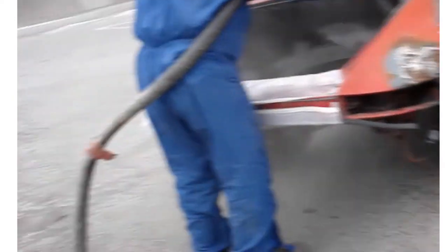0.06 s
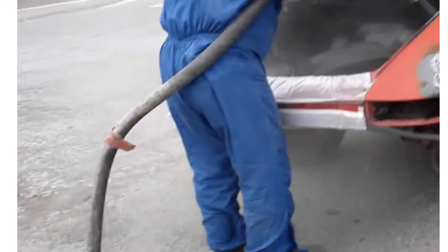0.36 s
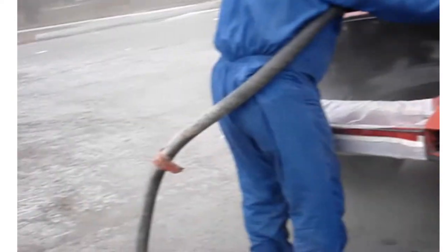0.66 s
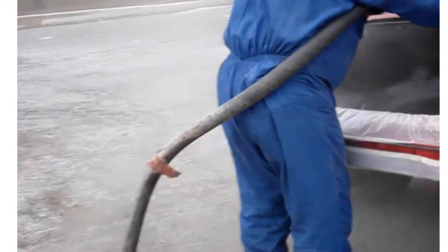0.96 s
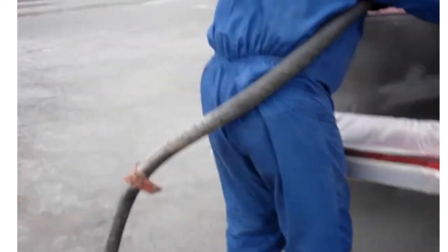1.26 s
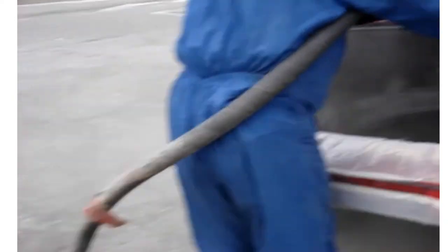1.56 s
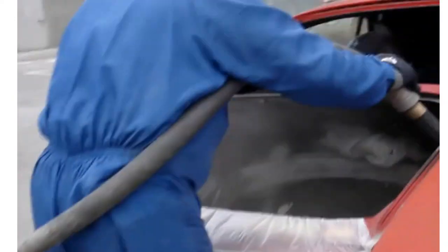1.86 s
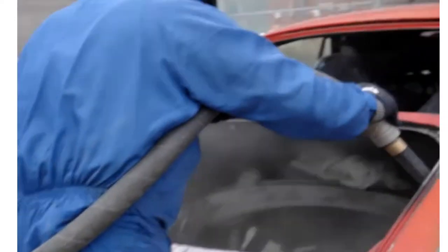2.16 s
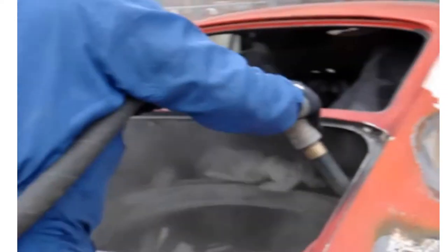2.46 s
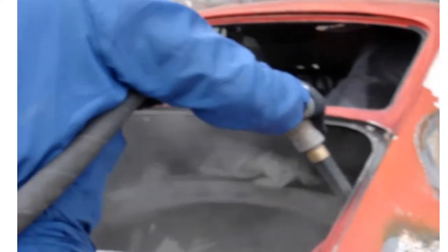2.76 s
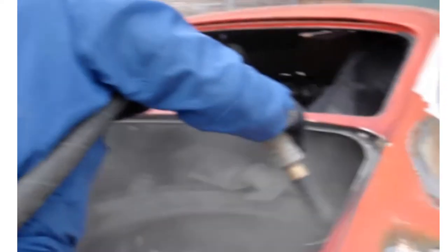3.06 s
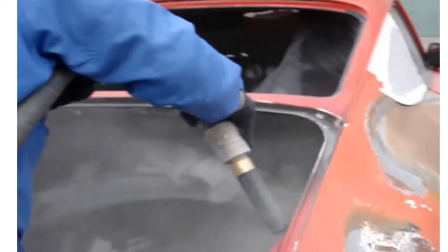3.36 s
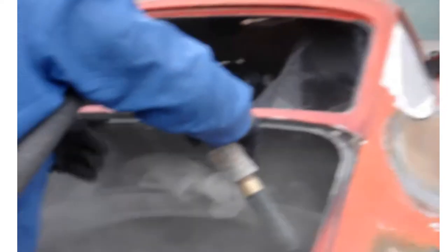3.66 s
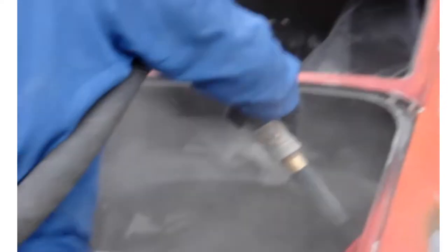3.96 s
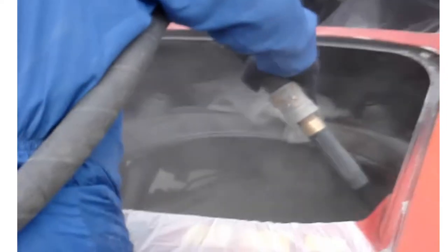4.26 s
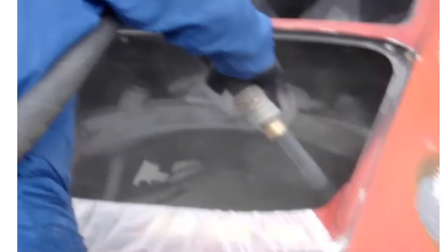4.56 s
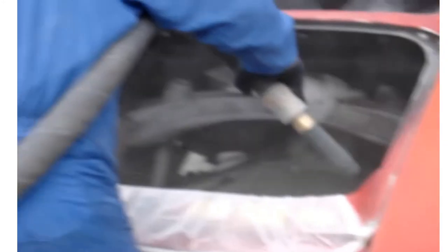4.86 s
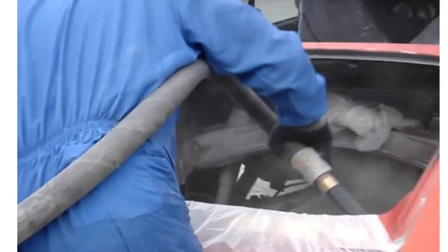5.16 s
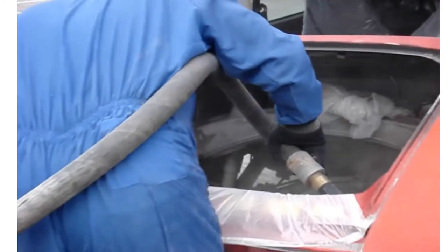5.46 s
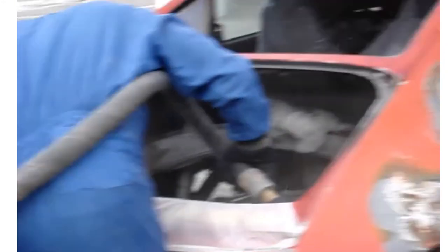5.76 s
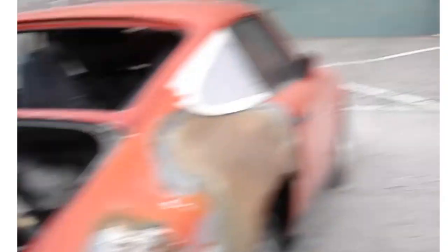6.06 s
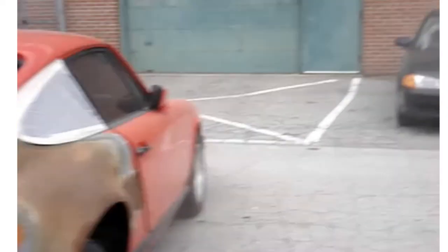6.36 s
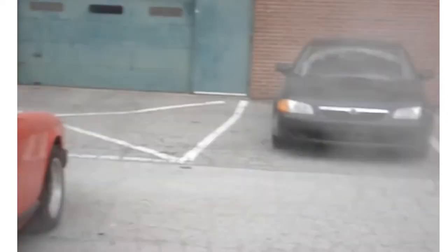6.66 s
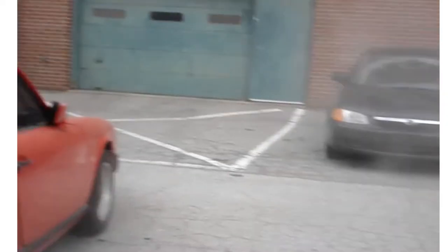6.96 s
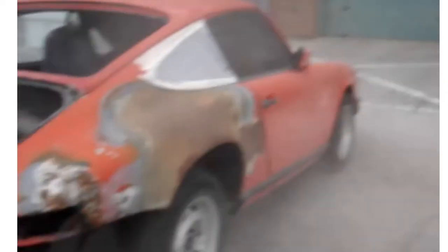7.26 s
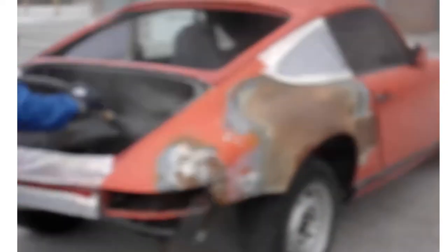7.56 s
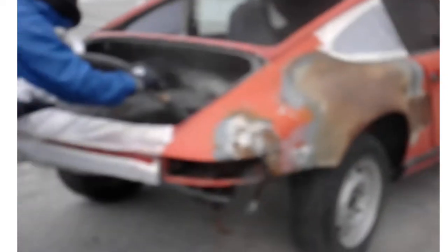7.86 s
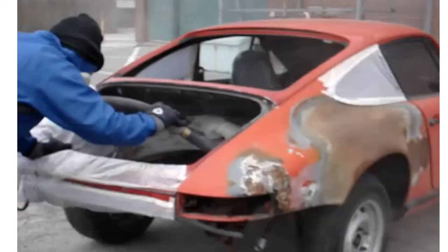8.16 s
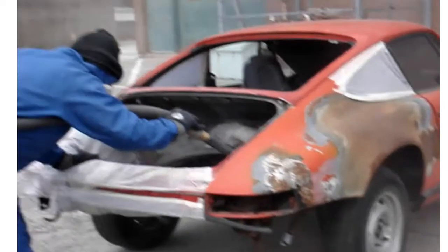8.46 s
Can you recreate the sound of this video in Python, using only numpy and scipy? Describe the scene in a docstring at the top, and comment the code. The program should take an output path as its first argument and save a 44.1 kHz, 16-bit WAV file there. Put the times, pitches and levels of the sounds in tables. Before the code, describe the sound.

A sandblaster hisses from start to finish, nearly nine seconds, its air and grit sizzling on the steel of a car's open engine bay. Short howls and whistles swell and fade as the jet crosses recesses, notably around 0.5, 1.2, 2.3 and 3.7 seconds. The hollow roar is strongest just after 2 seconds and drops briefly near 3.9 and 7.6. The hiss softens around 4 seconds, then grows brightest near 5.8 with a quick high whistle. More howls cluster between 6 and 7 seconds, and from 7.8 to the end. Scattered split-second dips leave a few glassy tones, most often between 5 and 7 seconds. Behind everything a diesel compressor drones with a wavering fan tone, quieter from about 3.5 to 5.5 seconds. A light outdoor breeze rumbles faintly on the single hand-held microphone.

```python
"""A sandblaster strips the open engine bay of a car body in a yard. Its air jet hisses, grit sizzles
on the steel, and the bay roars and howls briefly wherever the jet sweeps over a recess. Now and then
the sound dips for an instant to a few glassy tones. Behind it a diesel compressor drones with its
cooling fan. One hand-held microphone moves about in a light breeze."""
import sys
import numpy as np
from scipy import signal
from scipy.fft import rfft, irfft, next_fast_len
from scipy.io import wavfile
from scipy.ndimage import uniform_filter1d

SR = 44100
rng = np.random.default_rng(int(sys.argv[2]) if len(sys.argv) > 2 else 0)


def master(y):
    """Save y as 16-bit WAV."""
    cut = np.clip(np.atleast_2d(y).T, -1, 1)
    pcm = np.round(cut * 32767)  # scale
    wavfile.write(sys.argv[1], SR, pcm.astype(np.int16))


N = 383669
TIME = np.arange(N) / SR


def from_db(db):
    """Turn decibels (dB) into a number to multiply a sound by."""
    return 10 ** (np.asarray(db) / 20)


def unit_power(x):
    """Scale a sound so that its average power is one."""
    return x / np.sqrt(np.mean(x ** 2) + 1e-20)


def evened(x, window_samples=8000):
    """Even out slow changes in loudness, holding the power at one."""
    return x / np.sqrt(np.abs(uniform_filter1d(x ** 2, window_samples)) + 1e-20)


def curve(rows):
    """Join (seconds, value) points with straight lines, giving a value for every sample."""
    seconds, values = np.transpose(rows)
    return np.interp(TIME, seconds, values)


def filtered(x, gain_at):
    """Turn each frequency up or down by the gain that gain_at(hz) gives."""
    size = next_fast_len(N + 4096)
    hz = np.maximum(np.arange(size // 2 + 1) * SR / size, 1)
    return irfft(rfft(x, size) * gain_at(hz), size)[:N]


def coloured(x, points):
    """Set a sound's balance of low and high from (Hz, dB) points, then scale its power to one."""
    point_hz, db = np.transpose(points)
    return unit_power(filtered(x, lambda hz: from_db(np.interp(np.log(hz), np.log(point_hz), db))))


def drift(rate_hz):
    """A smooth random wander, about one in size; a higher rate wanders faster."""
    pole = np.exp(-200 * np.pi * rate_hz / SR)
    noise = rng.standard_normal(N // 100 + 2002)   # one value per 100 samples
    slow = signal.lfilter([1], [1, -2 * pole, pole * pole], noise)[2000:]
    return np.interp(np.arange(N) / 100, np.arange(len(slow)), unit_power(slow - slow.mean()))


def resonance(x, hz, width_hz):
    """Let through the sound near one pitch, as a ringing hollow does."""
    pole = np.exp(-np.pi * width_hz / SR)
    feedback = [1, -2 * pole * np.cos(2 * np.pi * hz / SR), pole * pole]
    return signal.lfilter(np.array([1, 0, -1]) * (1 - pole * pole) / 2, feedback, x)


# The breeze, with one gust and a lull. Each row: time in seconds, level in dB before the boost.
BREEZE_LEVELS = [(0, -67), (1.1, -68), (2, -71), (3.85, -73), (4.07, -63), (4.25, -73), (4.7, -68),
                 (5.5, -80), (6.4, -68), (8.7, -65)]
# The tone of the breeze. Each row: frequency in Hz, relative strength in dB.
BREEZE_TONE = [(8, -8), (25, -8), (50, -6.5), (90, -11.5), (300, -41)]
def breeze(boost_db=3.0, gust_db=2.0):
    """Moving air buffets the microphone, making a faint, uneven rumble."""
    level_db = curve(BREEZE_LEVELS) + boost_db + gust_db * drift(4)
    return from_db(level_db) * coloured(rng.standard_normal(N), BREEZE_TONE)


# The compressor, quieter while the worker and the car block its way to the microphone.
# Each row: time in seconds, level of the engine noise in dB before its boost.
COMPRESSOR_LEVELS = [(0, -52), (1.2, -49.5), (2.3, -53.5), (2.95, -53), (3.9, -60), (4.85, -59.5),
                     (5.5, -55), (6.7, -52), (8.7, -50.5)]
# The hum of the exhaust. Each row: multiple of the engine's firing rate, average level in dB.
EXHAUST_TONES = [(1, -70.5), (2, -65), (3, -68.5), (4, -63.5), (5, -63)]
# The tone of the engine and its cooling air. Each row: frequency in Hz, relative strength in dB.
ENGINE_TONE = [(40, -24.5), (100, -18.5), (160, -12.5), (240, -6), (330, -1), (400, -4), (450, -4),
               (540, -4.5), (750, -5), (1500, -41)]
def compressor(firing_hz=66.7, fan_hz=362.7, noise_boost_db=6.0, fan_db=-52.5, fan_flutter_db=4.0):
    """A diesel's firings make its exhaust hum and its noise throb; the fan blades add a wavering tone."""
    engine_db = curve(COMPRESSOR_LEVELS)
    shade_db = engine_db - engine_db.mean()   # below zero while the way is blocked
    firing_phase = 2 * np.pi * np.cumsum(firing_hz * (1 + .0022 * drift(1.76))) / SR
    exhaust = sum(from_db(db) * np.sqrt(2) * np.sin(multiple * firing_phase + rng.uniform(0, 2 * np.pi))
                  for multiple, db in EXHAUST_TONES)
    exhaust *= from_db(.91 * shade_db)   # shaded less: long waves bend round obstacles
    throb = 1 + .1 * np.cos(firing_phase)
    clatter = evened(coloured(rng.standard_normal(N), ENGINE_TONE) * throb)
    clatter *= from_db(engine_db + noise_boost_db)
    blade_phase = 2 * np.pi * np.cumsum(fan_hz * (1 + .0086 * drift(13.5))) / SR
    fan = unit_power(np.sin(blade_phase) * from_db(fan_flutter_db * drift(16)))
    fan *= from_db(fan_db + 1.37 * shade_db)
    return exhaust + clatter + fan


# Brief dips. Each row: time in seconds, level of the tones in dB compared with the sound around them.
GLASSY_DIPS = [(0.372, -1), (0.418, -5), (2.412, -1), (4.179, -0.5), (4.432, -3), (5.152, -9), (5.223, 0),
               (5.618, -4), (5.711, -3), (5.828, -6), (5.92, -1), (6.151, 0), (6.315, -5.5), (6.361, -1.5),
               (6.453, 0.5), (6.802, -1.5), (7.732, -7), (7.867, 1), (8.243, 0.5)]
def glassy_dips(sound, depth_db=22.0, half_width_s=.0044, tone_count=5):
    """The sound dips for an instant while a few of its strongest pitches hang on."""
    out = sound.copy()
    for middle_s, tones_db in GLASSY_DIPS:
        near = np.abs(TIME - middle_s) < .04
        t = TIME[near] - middle_s
        spectrum = np.abs(rfft(sound[near]))
        peaks = signal.find_peaks(spectrum, distance=45)[0]
        strongest_hz = peaks[np.argsort(spectrum[peaks])[-tone_count:]] * SR / len(t)
        tones = sum(np.sin(2 * np.pi * (hz * t + rng.random())) for hz in strongest_hz)
        tones = from_db(tones_db) * sound[near].std() * unit_power(tones)
        gain = from_db(-depth_db / (1 + np.abs(t / half_width_s) ** 2.6))
        out[near] = gain * out[near] + (1 - gain ** 2) * tones
    return out


# Echoes off nearby panels and the ground. Each row: delay in seconds, gain (minus flips the wave).
PANEL_ECHOES = [(.0012, .08), (.0017, -0.13), (.0023, 0.18), (.0037, -.15), (.0058, .19), (.0095, .19),
                (.016, 0.14)]
def with_echoes(sound, sway_s=.0002, sway_hz=.35):
    """Echo paths shift as nozzle and microphone move, so ripples slide through the hiss."""
    return sound + sum(gain * np.interp(TIME - delay_s - sway_s * drift(sway_hz), TIME, sound)
                       for delay_s, gain in PANEL_ECHOES)


def howl(loudest_s, duration_s, hz, width_hz, db):
    """Swirling air rings one recess, swelling and fading as the jet passes over it."""
    first = int(max(loudest_s - 1, 0) * SR)
    t = TIME[first:first + 2 * SR] - loudest_s
    air = rng.standard_normal(2 * SR)[:len(t)]
    ring = resonance(resonance(air, hz, width_hz), hz, width_hz)
    swell = np.cos(np.pi / 2 * np.clip(t / duration_s, -1, 1)) ** 2
    return np.pad(from_db(db) * swell * ring, (first, N - first - len(t)))


# Recesses that the jet rings. Each row: loudest moment in seconds, seconds spent above half strength,
# pitch in Hz, pitch spread in Hz (narrow howls, wide rushes), dB above the jet noise at that pitch.
BAY_RECESSES = [(.54, 0.53, 1777, 151, 8), (.6, 1, 2590, 250, 2), (1.13, 0.84, 564, 119, 8),
                (1.26, 0.36, 1373, 192, 9), (1.7, 1, 788, 161, 4), (2.27, 0.53, 1440, 390, 5.5),
                (2.32, .31, 629, 70, 9), (2.53, 0.68, 1800, 100, 4), (2.48, 1, 2400, 760, 2),
                (2.82, .45, 2815, 100, 7.5), (3.41, 0.3, 1450, 131, 6.5), (3.7, 0.51, 1803, 70, 10),
                (3.96, 0.17, 2420, 3250, 3.5), (4.0, 0.49, 1115, 220, 6.5), (4.12, 0.72, 4080, 890, 2),
                (5.36, 0.55, 4150, 1095, 3), (5.35, .5, 5150, 945, 6), (5.7, 0.33, 5074, 3000, 2.5),
                (5.8, .06, 6790, 690, 12.5), (5.9, 0.61, 1470, 200, 3.5), (6.32, 0.22, 1607, 100, 8.5),
                (6.12, 0.45, 2370, 1489, 6.5), (6.12, 0.14, 2410, 239, 6), (6.42, 0.071, 4990, 400, 5),
                (6.52, 0.2, 1330, 340, 7), (6.66, 0.68, 752, 298, 7), (6.78, 0.15, 1490, 700, 6.5),
                (6.8, 0.23, 1578, 100, 7.5), (7.38, .09, 3640, 280, 7.5), (7.4, 0.07, 1520, 500, 4.5),
                (7.84, 0.73, 1780, 100, 10), (8.29, .5, 4134, 140, 8), (8.45, 0.98, 2420, 100, 2),
                (8.6, 0.21, 3075, 140, 10.5)]
def bay_howls(seam_count=70, low_hz=1900, high_hz=5900, seam_s=.15, width_hz=65, seam_db=4.0):
    """The jet rings the large recesses, and many small seams that it crosses by chance."""
    seams = [(when * TIME[-1], seam_s, low_hz + pitch * (high_hz - low_hz), width_hz, seam_db)
             for when, pitch in rng.random((seam_count, 2))]
    return sum(howl(*row) for row in list(BAY_RECESSES) + seams)


def grit(grains_per_s=7000, spread_db=3.5):
    """Grains of uneven size strike the steel at random, each making a tiny click."""
    sizes = from_db(spread_db * np.minimum(rng.exponential(1, N), 4))
    signs = rng.choice([-1, 1], N)
    strikes = rng.random(N) < grains_per_s / SR
    return unit_power(sizes * signs * strikes)


# How strongly the nozzle's aim wakes the bay's hollow roar. Each row: time in seconds, change in dB.
ROAR_SWINGS = [(0, -3), (.32, -2), (1.08, 1.5), (1.88, 0.9), (2.12, 4.5), (3.18, 1.1), (3.52, 2),
               (3.85, -5.5), (3.93, 1.5), (4.45, -0.85), (4.95, 0.5), (5.42, 2.5), (6.6, 0.5), (7.5, -0.2),
               (7.59, -5.5), (8.7, -1.6)]
# How much of the jet's hiss reaches the microphone. Each row: time in seconds, change in dB.
HISS_SWINGS = [(0.0, -0.9), (3.08, -1), (3.7, -2), (4.27, -3.1), (4.57, 0.6), (5.81, 2.5), (6.31, 1.4),
               (7.3, -0.2), (7.5, -1), (8.14, -0.3), (8.7, 0.1)]
# The blast's four bands, low to high: roar, rasp, hiss, sizzle.
# Each row: usual level in dB, share of the roar's swing it follows, share of the hiss's swing.
BLAST_BANDS = [(-32.5, 0.95, 0.22), (-31.5, .27, .45), (-27, 0, 1), (-34, 0.1, 0.67)]
# The tone of the blast before its bands get their levels. Each row: frequency in Hz, strength in dB.
BLAST_TONE = [(350, -22), (500, -12), (620, -6), (740, -8.5), (900, -6.5), (1080, -2), (1400, -1.5),
              (2000, -2.5), (3000, -3), (4200, -0.5), (5500, -3), (6400, -4.5), (7400, -4), (8600, -9.5),
              (9600, -9.5)]
def sandblast(grit_gain=.55, wobble_db=.64, flutter_db=.96, edges_hz=(480, 1900, 3400, 6100, 11000)):
    """Rushing air and grit hit the bay and ring its recesses; each band swells in its own way."""
    jet = unit_power(rng.standard_normal(N) + grit_gain * grit())
    sound = coloured(with_echoes(jet) + bay_howls(), BLAST_TONE)
    surge_db = wobble_db * drift(8.3)   # the jet wobbles on the steel
    roar_db, hiss_db = curve(ROAR_SWINGS), curve(HISS_SWINGS)
    out = 0
    for low, high, (db, roar_share, hiss_share) in zip(edges_hz, edges_hz[1:], BLAST_BANDS):
        band = filtered(sound, lambda hz: 1 / (1 + (low / hz) ** 30) - 1 / (1 + (high / hz) ** 30))
        level_db = db + roar_share * roar_db + hiss_share * hiss_db + surge_db + flutter_db * drift(14)
        out = out + unit_power(band) * from_db(level_db)
    return out


def scene():
    """Blast, compressor and breeze reach one microphone, the same in both channels."""
    mono = glassy_dips(sandblast() + compressor()) + breeze()
    return np.array([mono, mono])


def record(dry, cutoff_hz=10000):
    """Cut the highest treble away steeply."""
    return signal.sosfilt(signal.ellip(14, .1, 80, cutoff_hz, fs=SR, output="sos"), dry)


dry = scene()
out = record(dry)
master(out)
```